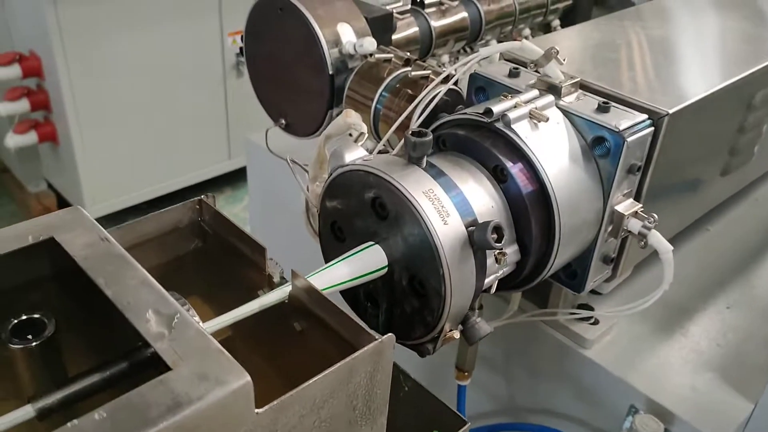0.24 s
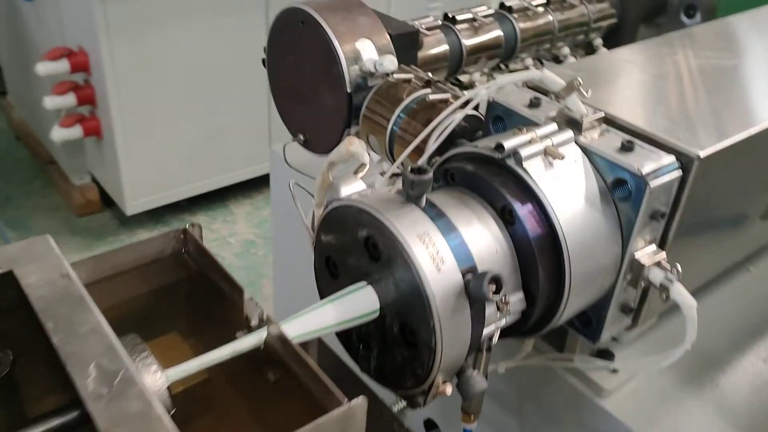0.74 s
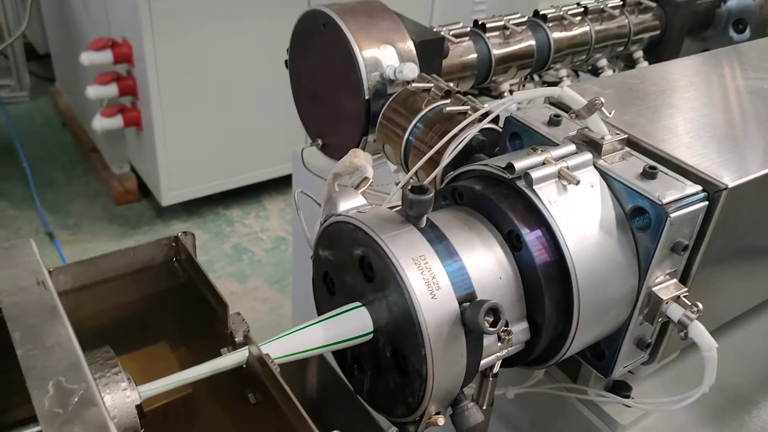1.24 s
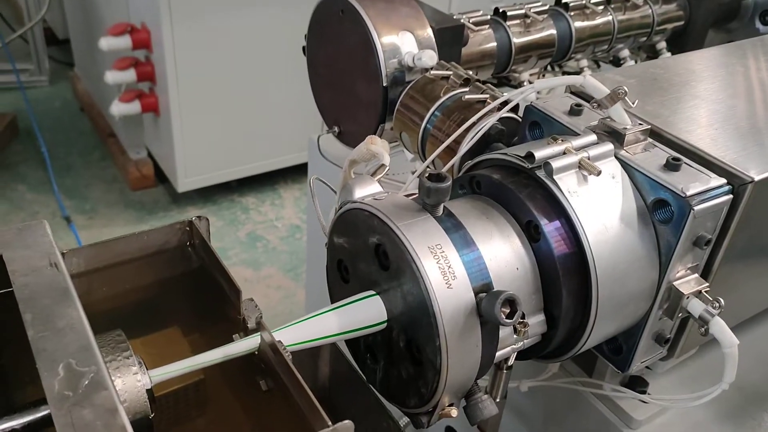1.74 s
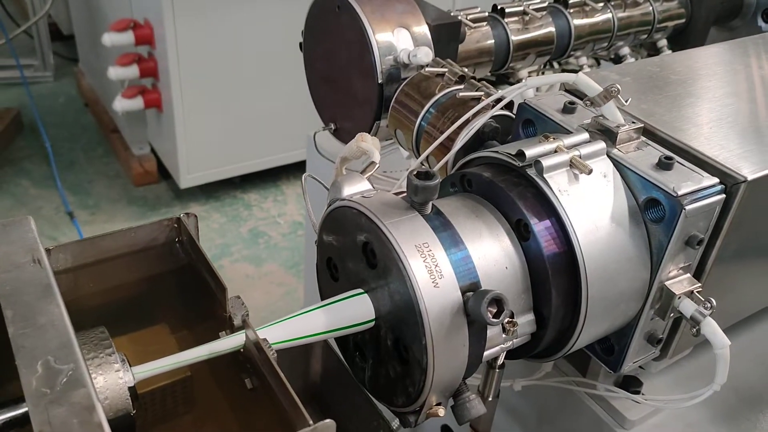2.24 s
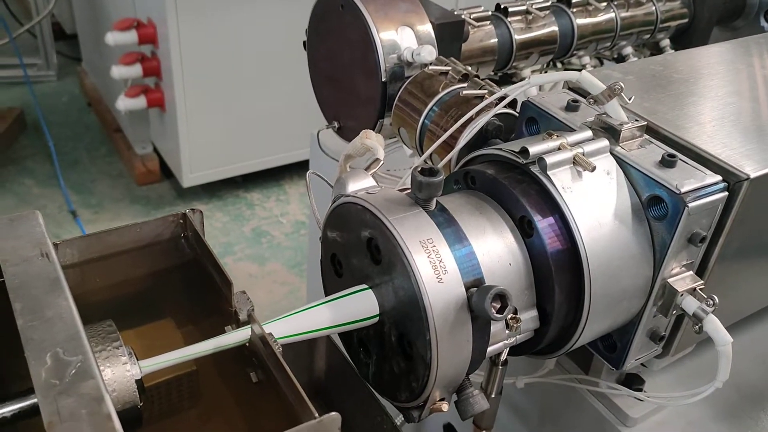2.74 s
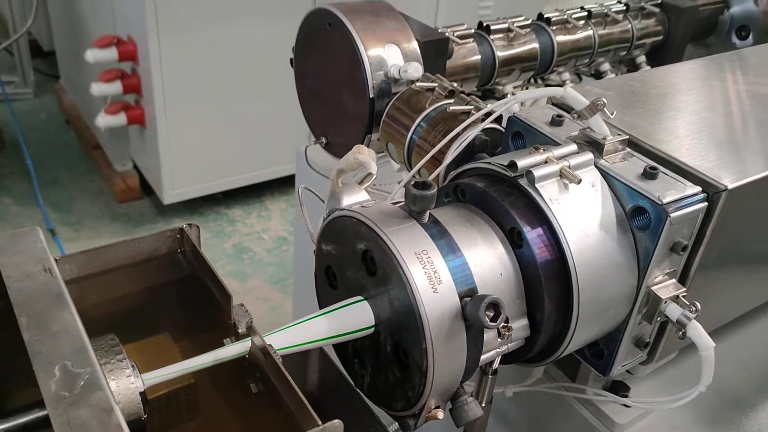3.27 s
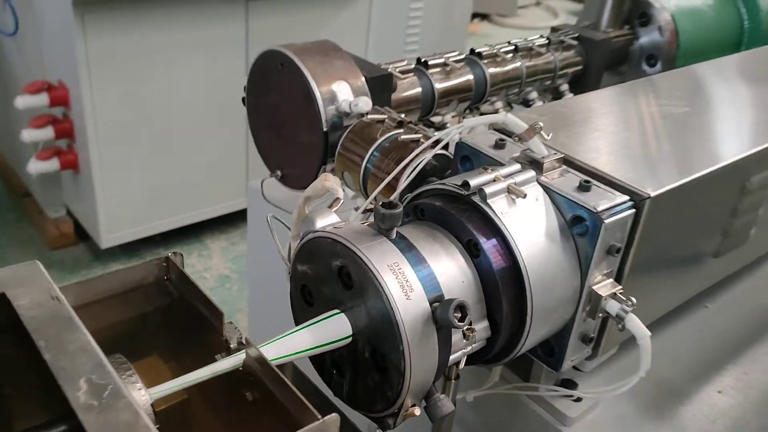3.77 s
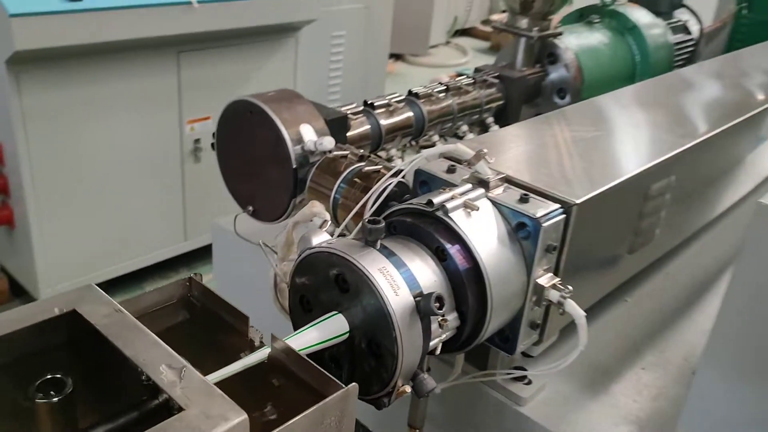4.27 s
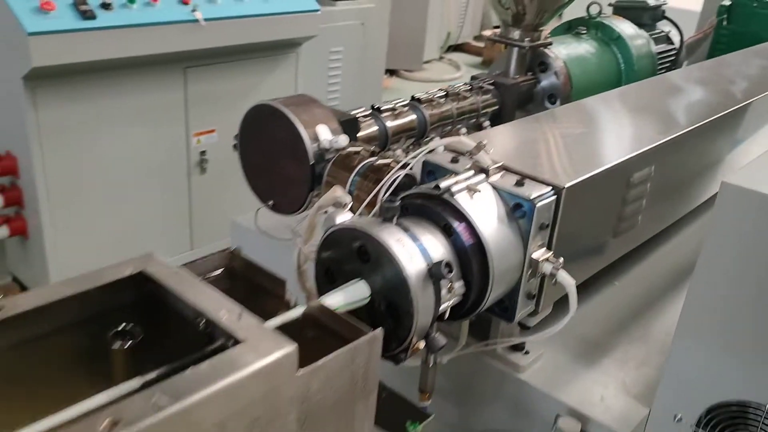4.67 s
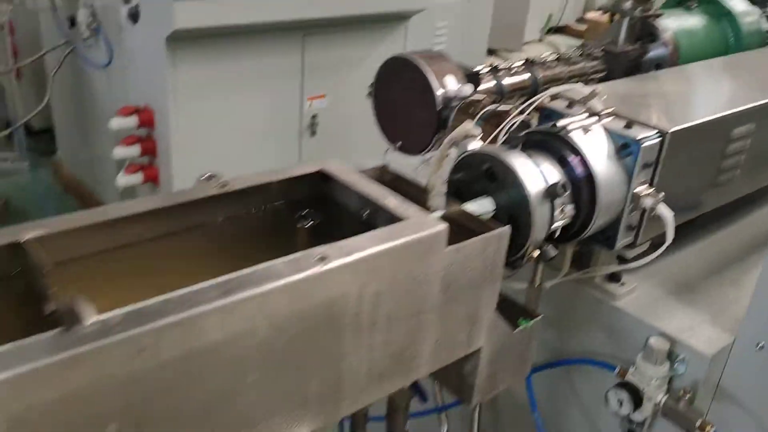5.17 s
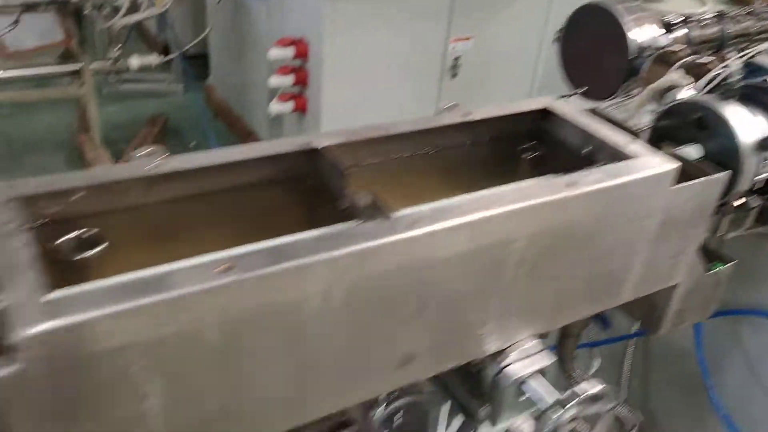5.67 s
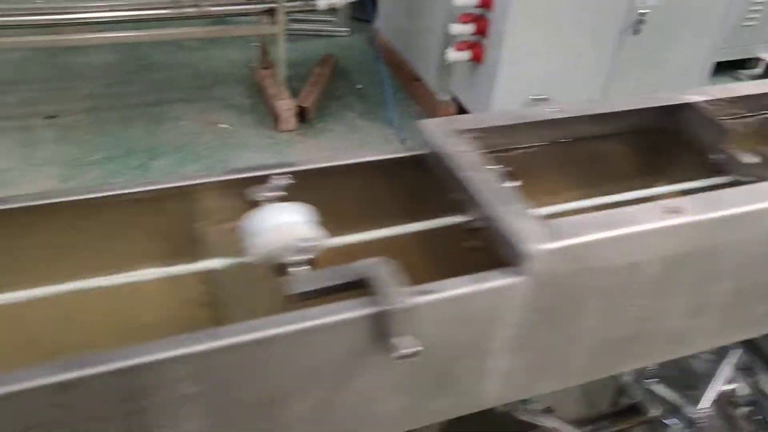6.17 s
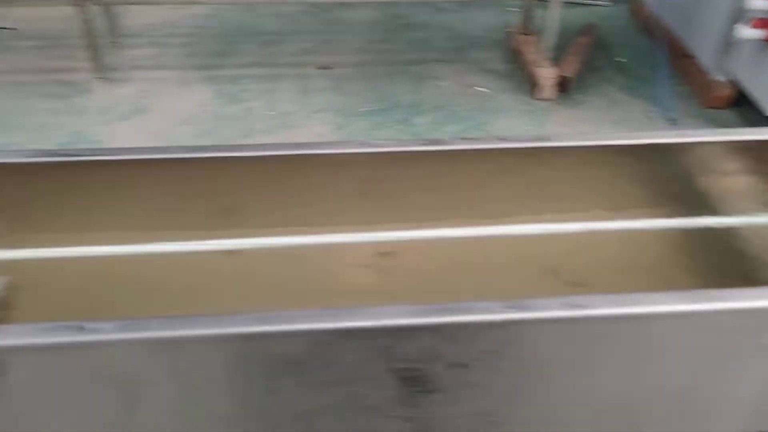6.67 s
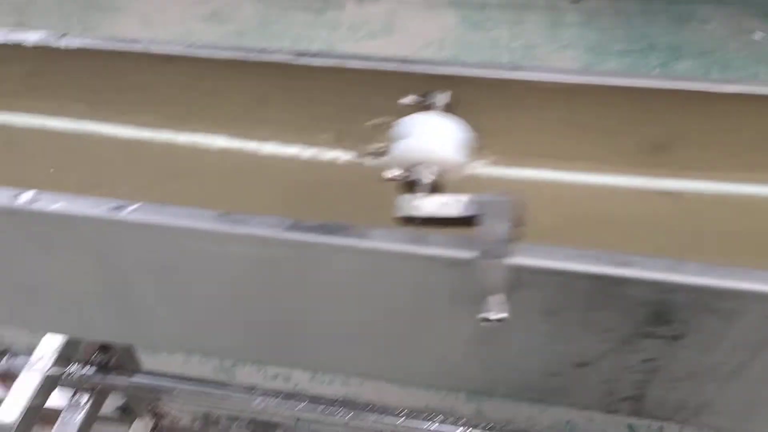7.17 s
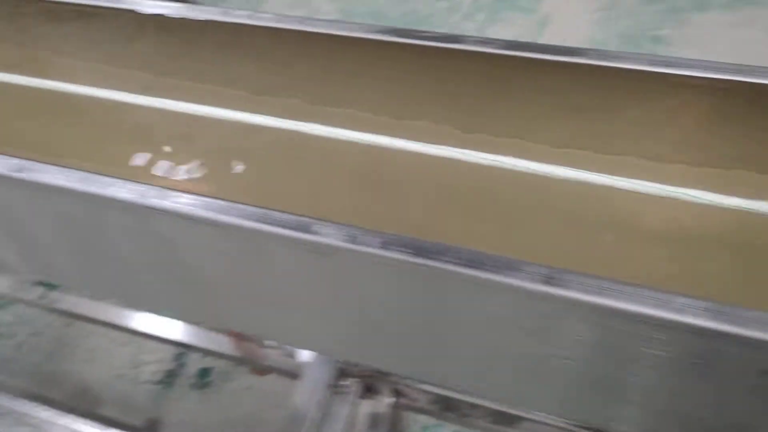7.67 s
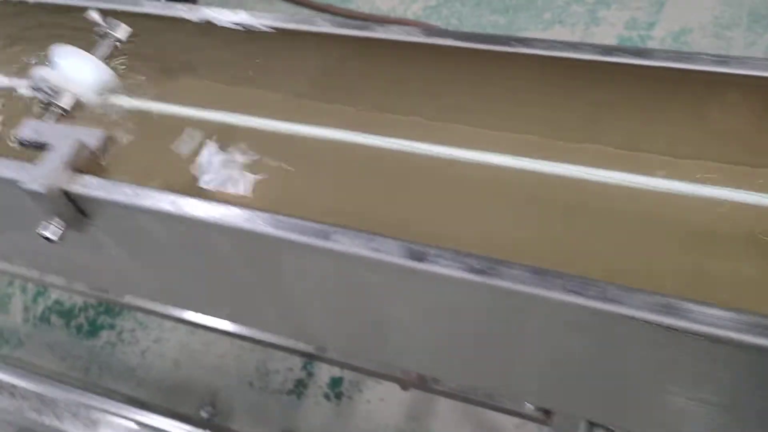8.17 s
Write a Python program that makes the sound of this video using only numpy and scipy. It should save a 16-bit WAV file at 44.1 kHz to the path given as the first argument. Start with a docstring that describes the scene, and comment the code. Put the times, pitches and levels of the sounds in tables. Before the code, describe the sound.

A steady, piercing air hiss and whistling suction over a low machine hum, with a rapid regular clacking that grows into thuds in a factory hall.

```python
"""Straw extrusion line in a factory hall

A phone with two ports is carried from the die along the cooling trough. An air jet and a suction tank hiss as
filtered turbulence, an air leak whistles through narrow resonances, and motors hum as wavering sines.
A cutter chops about five times a second, its impacts ringing damped modes, and its frame grows louder on the way.
Two hollow knocks are ringing noise bursts; two footsteps are low, brief thuds with a scuff of noise.
"""
import sys
import numpy as np
from scipy import signal
from scipy.fft import rfft, irfft
from scipy.io import wavfile
from scipy.ndimage import uniform_filter1d

SR = 44100
rng = np.random.default_rng(int(sys.argv[2]) if len(sys.argv) > 2 else 0)


def unload_wav(signal):
    """Save mono or channel-first audio to the path in sys.argv[1] as 16-bit WAV at rate SR, clipped to [-1, 1]."""
    wavfile.write(
        sys.argv[1],
        SR,
        np.round(np.clip(np.atleast_2d(signal).T, -1, 1) * 32767).astype(np.int16),
    )


N = 371322
TIME = np.arange(N) / SR  # s
BINS = np.arange(N // 2 + 1) * SR / N  # Hz
STROKE_S, FIRST_STROKE_S = .19065, .1025  # the cutter's period and first cut
# lag between the ports, in samples: for sound from obliquely ahead, and for sound from one side
PORT_LAG, BROADSIDE_LAG = 8, 16


def undb(db):
    """Amplitude gain is ten to the power of a twentieth of the decibels."""
    return 10 ** (np.asarray(db) / 20)


def unit(x):
    """Normalise the power: rms 1."""
    return x / np.sqrt(np.mean(x ** 2))


def curves(table):
    """Linear interpolation gives each column of a table a value per sample."""
    s, *columns = np.transpose(table)
    return [np.interp(TIME, s, column) for column in columns]


def slope(points):
    """Spectral envelope: gain per frequency from (Hz, dB) points, falling as the fourth power beyond the ends."""
    hz, db = np.transpose(points)
    f = np.maximum(BINS, 1)
    skirts = np.minimum(1, np.minimum(f / hz[0], hz[-1] / f)) ** 4
    return undb(np.interp(np.log(f), np.log(hz), db)) * skirts


def resonances(modes):
    """Damped oscillators: the complex response of each (Hz, width Hz, dB) mode."""
    f = np.maximum(BINS, 1)
    return [undb(db) / (1 + 1j * (f / hz - hz / f) * hz / width) for hz, width, db in modes]


def colour(x, gain):
    """Linear filtering multiplies the spectrum by a gain per frequency; rms 1."""
    return unit(irfft(rfft(x) * gain, N))


def drift(rate_hz):
    """Low-passed random phases make a smooth random drift of rms 1."""
    slow = BINS[BINS < 4 * rate_hz + 1]
    phases = np.exp(2j * np.pi * rng.random(4096)[:len(slow)])
    return unit(irfft(phases / (1 + (slow / rate_hz) ** 4), N))


def diffuse(alike_hz=720):
    """Diffuse-field coherence: noise at two ports is alike in the bass, unrelated in the treble."""
    likeness = .95 / (1 + (BINS / alike_hz) ** 3)
    mid, side = rfft(rng.standard_normal((2, N)))
    mid = mid * np.sqrt(1 + likeness)
    side = side * np.sqrt(1 - likeness)
    return unit(irfft(np.array([mid + side, mid - side]), N))


def pan(left_over_right_db):
    """Constant-power panning: left and right gains for a level difference."""
    half_db = np.array([left_over_right_db, -left_over_right_db]).reshape(2, -1) / 2
    gains = undb(half_db)
    return gains / np.sqrt(np.mean(gains ** 2, axis=0))


def lagged(pair, count):
    """Interaural delay: sound from the right reaches the left port some samples later."""
    return np.array([np.roll(pair[0], count), pair[1]])


def walked():
    """Uniform motion: metres from the die along the line, after a wait there."""
    start_s, pace_m_per_s = 3.28, 0.502
    return pace_m_per_s * np.maximum(TIME - start_s, 0)


def past(place_m, fade_m):
    """Gradual unmasking: rises smoothly from 0 to 1 as the phone passes a place."""
    return .5 + .5 * np.tanh((walked() - place_m) / fade_m)


def tones(lines):
    """Rotating machines radiate line spectra, which waver as the phone moves through standing waves."""
    total = 0
    for hz, db in lines:
        level = undb(db + 0.41 * drift(0.6))
        phase = 2 * np.pi * (hz * TIME + rng.random()) + 0.73 * drift(1.4)
        total = total + level * np.sin(phase)
    return np.sqrt(2) * total  # a line at 0 dB has rms 1


def stroke_times():
    """Periodic excitation: the cutter's even beat, in seconds."""
    return np.arange(FIRST_STROKE_S, N / SR + 1, STROKE_S)


def repeated(response):
    """Convolution with a pulse train: one response per stroke, each a little stronger or weaker."""
    starts = stroke_times()
    lead = int(round(2 * STROKE_S * SR))  # the cutter is already running
    blows = np.zeros(N + 2 * SR)
    blows[(starts * SR).astype(int)] = undb(0.2 * rng.standard_normal(len(starts)))
    return signal.fftconvolve(blows[None], response[:, :SR], axes=1)[:, lead:lead + N]


def echoes(delay_s, t60_s, tail_db, hall_t60_s):
    """Exponential reverberant decay: a dense burst of early reflections, then the hall's tail."""
    age = np.maximum(TIME[:SR] - delay_s, 0)
    early = undb(-60 * age / t60_s)
    late = undb(tail_db - 60 * age / hall_t60_s)
    return diffuse()[:, :SR] * (early + late) * (age > 0)


def strokes(delay_s, t60_s, tail_db, hall_t60_s, count=4):
    """Reverberant strokes whose echo pattern, set by position in the hall, is crossfaded at constant power."""
    place = TIME / TIME[-1] * (count - 1)
    total = 0
    for k in range(count):
        weight = np.cos(np.pi / 2 * np.clip(place - k, -1, 1))
        total = total + repeated(echoes(delay_s, t60_s, tail_db, hall_t60_s)) * weight
    return total


def even(x):
    """Running power normalisation: hold the level, averaged over two strokes, at rms 1."""
    power = uniform_filter1d(np.mean(x ** 2, axis=0), int(2 * STROKE_S * SR))
    return x / np.sqrt(power)


def glancing(x, echo_db=-10, drift_s=0.000139):
    """Comb filtering: steel panels return near echoes whose delays drift with the hand."""
    delays_s = rng.uniform(.001, .008, 3)
    near = sum(np.interp(TIME - d - drift_s * drift(0.71), TIME, x) for d in delays_s)
    return (x + undb(echo_db) * near) / np.sqrt(1 + len(delays_s) * undb(echo_db) ** 2)


def air_jet():
    """Jet turbulence beams its treble at the left port, is shaded at the right, and reflects to both."""
    # The jet as the phone leaves its beam. Each row: time in seconds, core level in dB, sizzle level in dB.
    jet_levels = [(0, -25.5, -36), (1.0, -24, -30), (3.6, -24, -29.5), (4.7, -25.5, -32),
                  (5.25, -24.5, -28.5), (5.7, -24, -30), (5.92, -30, -41), (6.35, -33, -42),
                  (6.65, -33, -34.5), (7.0, -38, -36), (8.42, -39, -40)]
    # Spectra of its low skirt, core and sizzle. Each row: frequency in Hz, relative density in dB per Hz.
    jet_skirt = [(4300, 6.5), (4900, 6.5), (5350, -2.5), (5750, 13), (6100, 5), (6700, -0.5)]
    jet_core = [(5800, -18), (6450, -3.5), (6850, -5.5), (7300, 0), (7700, -2.5), (8300, -7), (8900, -12),
                (10200, -15.5), (12000, -33)]
    jet_sizzle = [(9500, -55), (11500, 0.5), (13200, 1), (14300, 8), (15700, 2.5)]
    # Spectrum of the hiss that fills the hall. Each row: frequency in Hz, relative density in dB per Hz.
    hall_hiss = [(3900, -21), (5000, -3.5), (5700, -33), (6100, -21), (6500, -0.5), (6800, 0), (7400, 4),
                 (8200, 2.5), (8900, -8.5), (10400, -4.5), (12500, -16.5), (14300, -20), (15700, -10)]
    # Right port against left, shaded by the phone's body. Each row: frequency in Hz, gain in dB.
    body_shade = [(4000, -36), (7300, -20), (9000, -11), (10800, -38), (13000, -21), (16000, -31)]
    turned = past(1.82, 0.029)  # the tank hides the jet and the phone turns along the trough
    skirt_db = -35 - 3 * turned  # the skirt spreads widely and so drops only a little
    core_db, sizzle_db = curves(jet_levels)
    beam = 0
    for shape, db in ((jet_skirt, skirt_db), (jet_core, core_db), (jet_sizzle, sizzle_db)):
        beam = beam + colour(rng.standard_normal(N), slope(shape)) * undb(db + 0.84 * drift(23))
    beam = glancing(beam)
    # the phone swings round once, and the jet crosses from the left port towards the right
    swing_s, swing_length_s, swing_left_db, swing_right_db = 7.12, 0.26, -7.5, 12
    swing = np.exp(-((TIME - swing_s) / swing_length_s) ** 2)
    left = beam * undb(swing_left_db * swing)
    shaded = irfft(rfft(beam) * slope(body_shade), N)
    turned_db = 8  # part of the shade lost once the phone has turned
    right = np.roll(shaded, BROADSIDE_LAG) * undb(turned_db * turned + swing_right_db * swing)
    reflected = colour(diffuse(), slope(hall_hiss)) * undb(-33.5 + 1.0 * drift(14))
    return np.array([left, right]) + reflected


def blown(modes, waver_db, rate_hz, direct_db, wander_s, sputter_db):
    """Sputtering turbulence drives wavering resonances; part arrives straight, part by the walls."""
    total = 0
    sputter = undb(sputter_db * drift(53))
    narrowed = [(hz, 0.6 * width, db) for hz, width, db in modes]
    for response in resonances(narrowed):
        drive = (diffuse() + undb(direct_db) * rng.standard_normal(N)) * sputter
        voice = irfft(rfft(drive) * abs(response) ** 2, N)
        total = total + voice * undb(waver_db * drift(rate_hz))
    clock = TIME - wander_s * drift(4.0)  # a drifting delay bends the pitch
    return lagged(unit(np.array([np.interp(clock, TIME, side) for side in total])), BROADSIDE_LAG)


def suction():
    """Flow-excited resonance: air and water sucked through the tank's gaps seethe, a small leak whistles above."""
    # Tank, loudest as the phone passes its mouth, then the leak.
    # Each row: time in seconds, level in dB, left minus right in dB.
    tank_levels = [(0, -40, 3.5), (1.4, -36.5, 1), (3.6, -37, 2), (4.5, -40, 6), (5.6, -36.5, 0.5),
                   (5.9, -33, 4), (6.1, -32.5, 7), (6.4, -32, 11), (6.68, -28, 18), (6.9, -33, 12),
                   (7.2, -39, 5), (7.7, -34, 12), (8.42, -32, 16)]
    leak_levels = [(0, -38.5, 4), (1.1, -37.5, 0.5), (3.0, -40, -1.5), (4.3, -35.5, 5.5), (5.05, -36, 4.5),
                   (6.2, -43.5, -1), (6.9, -38.5, 0), (7.3, -43, -2), (8.42, -41, 0)]
    # Their resonances, before narrowing and squaring. Each row: frequency in Hz, width in Hz, gain in dB.
    tank_modes = [(1830, 320, -19), (2212, 360, 0.5), (2400, 30, 1), (2453, 54, 5.5), (2604, 720, 1.5),
                  (2738, 63, 6), (2850, 16, 4), (2963, 490, 3)]
    leak_modes = [(3373, 155, 2.5), (3596, 560, -1), (3773, 93, -1), (4165, 78, -0.5)]
    tank_db, tank_pan = curves(tank_levels)
    leak_db, leak_pan = curves(leak_levels)
    tank = blown(tank_modes, waver_db=2.0, rate_hz=12.0, direct_db=0.0, wander_s=0.000089, sputter_db=0.5)
    leak = blown(leak_modes, waver_db=1.17, rate_hz=20, direct_db=-15.0, wander_s=0.000302, sputter_db=0.5)
    return tank * undb(tank_db) * pan(tank_pan) + leak * undb(leak_db) * pan(leak_pan)


def hall():
    """A diffuse field: the wash of fans and distant machines from all round."""
    # Each row: frequency in Hz, relative density in dB per Hz.
    hall_spectrum = [(12, -11), (27, 2), (45, -11.5), (70, -7.5), (100, -8.5), (140, -9), (200, -2),
                     (300, -0.5), (430, -10), (600, -10), (800, -4.5), (1100, -9.5), (1600, -12),
                     (2600, -10.5), (4500, -24)]
    return colour(diffuse(), slope(hall_spectrum)) * undb(-39.5 + .5 * drift(15)) * pan(3.8)


def extruder():
    """Inverse-distance law: barrel fans and the drive's hum fall off as the phone moves away."""
    # Fan rush. Each row: frequency in Hz, relative density in dB per Hz.
    fan_spectrum = [(230, 0), (290, -7.5), (320, -15), (352, 7.5), (388, 1.5), (430, 7), (490, 5.5),
                    (525, 2), (580, 4), (680, 1), (760, 0), (950, -7), (1300, -25), (1700, -15)]
    # Drive shaft, mains and gearbox lines. Each row: frequency in Hz, rms level in dB before the drive gain.
    drive_lines = [(25.0, -67), (88.9, -67), (94.0, -54), (100.0, -57.5), (109.6, -54.5), (114.8, -55),
                   (293.9, -62.5), (412.1, -56), (423.0, -53.5), (565.5, -61), (749, -58)]
    aside_m, fan_db, drive_db = 1.42, -41, 1.5  # levels as heard from the start of the walk
    nearness = aside_m / np.hypot(aside_m, walked())
    fans = colour(diffuse(), slope(fan_spectrum)) * undb(fan_db + .5 * drift(2.0))
    drive = tones(drive_lines) * undb(drive_db)
    return (fans * pan(3.9) + drive * pan(6.0)) * nearness


def trough(grain_db=1.5):
    """Amplitude-modulated noise: cooling water in the open trough seethes in fine, uneven grains."""
    # Each row: frequency in Hz, relative density in dB per Hz.
    water_spectrum = [(900, -7), (1400, -10), (1780, 2.5), (1980, 1), (2180, 5.5), (2450, 6), (3000, -20),
                      (3900, -32)]
    level_db = -56 + 19.5 * past(1.12, 0.62)
    grains = diffuse() * undb(grain_db * drift(62))
    return colour(grains, slope(water_spectrum)) * undb(level_db) * pan(8)


def cutter(load_depth=0.45, load_delay_s=0.067, return_db=-9, rebound_db=-10):
    """Impulsive excitation of modes: guard and frame ring twice a stroke, out and back, over the motor's hum."""
    # The cutter's frame, then its sheet guard. Each row: frequency in Hz, width in Hz, gain in dB.
    frame_modes = [(143, 17, -3.5), (180.3, 11, -5.5), (215.4, 10, 0), (249.5, 4.8, 0), (292.6, 20, -0.5),
                   (329, 28, -5), (480, 116, -9.5)]
    guard_modes = [(765, 110, 4.5), (868, 58, 9), (918, 55, 4.5), (1045, 60, -4), (1250, 400, -15)]
    # Motor lines. Each row: frequency in Hz, level in dB against the motor's level.
    motor_lines = [(108.5, -10), (183.2, 2.5), (215.2, -30), (306.8, -18)]
    along_m, aside_m, thump_db = 3.7, 1, -52.5  # place from the die; the frame's level as heard there
    nearness = np.hypot(along_m, aside_m) / np.hypot(along_m - walked(), aside_m)
    guard_db = -53 + 13 * past(2.07, 0.25)  # screened until the phone has come far enough
    motor_db = -59.5 + 9.5 * past(0.79, 0.13)  # comes out from behind the tank

    rattle = strokes(0.00037, t60_s=0.069, tail_db=-14, hall_t60_s=1.0)
    rebound = repeated(echoes(.082, t60_s=0.076, tail_db=-22, hall_t60_s=.6))
    rattle = rattle + undb(rebound_db) * rebound
    guard = even(colour(rattle, sum(r * abs(r) for r in resonances(guard_modes))))

    shake = strokes(0.0038, t60_s=0.15, tail_db=-7.0, hall_t60_s=1.0)
    shake = shake + undb(return_db) * strokes(.04, t60_s=0.071, tail_db=-12, hall_t60_s=0.47)
    frame = 0
    for response, (_, width, db) in zip(resonances(frame_modes), frame_modes):
        ring = even(colour(shake, response * abs(response)))
        # a wide mode takes up more of the blow than a narrow one
        frame = frame + ring * undb(db) * np.sqrt(width)
    frame = unit(frame)

    # the motor labours once in every stroke
    load = 1 + load_depth * np.cos(2 * np.pi * (TIME - FIRST_STROKE_S - load_delay_s) / STROKE_S)
    motor = load * tones(motor_lines) * undb(motor_db)
    return (frame * undb(thump_db) * nearness + motor + guard * undb(guard_db)) * pan(4.4)


def blade(crack_db=30, scatter_db=0.5):
    """Modal impact: each dry clack strikes the blade's modes differently, and faint reflections follow."""
    # Blade. Each row: frequency in Hz, width in Hz, gain in dB.
    blade_modes = [(1040, 87, 4), (1230, 370, 4), (1460, 480, -1.5)]
    # The clack along the way. Each row: time in seconds, level in dB.
    clack_levels = [(0, -38), (0.3, -37), (0.49, -40), (1.06, -32), (1.25, -33), (1.44, -33), (1.82, -35),
                    (2.01, -36.5), (2.2, -35), (2.4, -34), (2.58, -34.5), (2.96, -32), (3.53, -33),
                    (3.75, -37), (4.68, -39), (5.05, -36), (5.25, -50), (6.1, -36), (8.42, -41)]
    delay_s, crack_s = .0016, .003  # lag after the stroke; length over which the level is reckoned
    strike = np.zeros((2, N))
    strike[:, :SR] = echoes(0.0005, t60_s=0.03, tail_db=-17, hall_t60_s=.4)
    strike[:, 0] += undb(crack_db)  # the direct blow
    level_db, = curves(clack_levels)
    cuts = ((stroke_times() + delay_s) * SR).astype(int)
    cuts = cuts[cuts < N]
    rings = [rfft(strike) * r * abs(r) for r in resonances(blade_modes)]
    clacks = 0
    for ring in rings:
        blows = np.zeros(N)
        blows[cuts] = undb(level_db[cuts] + scatter_db * rng.standard_normal(len(cuts)))
        clacks = clacks + irfft(rfft(blows) * ring, N)
    one_clack_rms = irfft(sum(rings), N).std()
    return clacks / one_clack_rms * np.sqrt(crack_s * SR / N) * pan(4.8)


def carriage(near_db=-24.5, far_db=-30.5, room_db=-22):
    """Impact and reverberation: the carriage thuds on two stops, the hall fills the gaps; it grows on the walk."""
    # Stops, out and back. Each row: seconds after the cut, relative level in dB.
    stops = [(.018, -3), (.059, -5)]
    # The thud. Each row: frequency in Hz, width in Hz, gain in dB.
    thud_modes = [(184, 16, -5), (215, 25, -3), (300, 35, 3.5), (324, 45, -1)]
    ring = irfft(sum(r * abs(r) ** .5 for r in resonances(thud_modes)), N)
    thuds = sum(undb(db) * np.roll(ring, int(s * SR)) for s, db in stops) / abs(ring).max()
    direct = repeated(thuds[None])
    tail = even(colour(strokes(0.023, t60_s=0.18, tail_db=0, hall_t60_s=1.0), rfft(ring)))
    level_db = far_db + (near_db - far_db) * past(1.8, 0.41)
    return (direct + tail * undb(room_db)) * undb(level_db) * pan(5.9)


def tank_boom():
    """Structure-borne sound: strokes travel along the line and boom in the steel tank as the phone passes."""
    # The tank's hollow body. Each row: frequency in Hz, width in Hz, gain in dB.
    body_modes = [(442, 69, 1), (568, 68, 1.5), (655, 110, -0.5), (860, 240, -6.5)]
    boom_db, place_m, reach_m = -39.5, 1.68, 0.26
    shake = strokes(0.017, t60_s=.3, tail_db=-3, hall_t60_s=1.4)
    boom = even(colour(shake, sum(r * abs(r) for r in resonances(body_modes))))
    closeness = 1 / (1 + ((walked() - place_m) / reach_m) ** 2)
    return boom * undb(boom_db) * closeness * pan(9.8)


def knocks(t60_s=0.47, attack_s=0.0084):
    """Reverberant smearing: hollow knocks on the line are decaying noise bursts through a few modes."""
    # Each row: start in seconds, pitch in Hz, peak in dB before panning.
    knock_events = [(3.62, 595, -32), (4.095, 743, -29.5)]
    # Each row: multiple of the pitch, width in Hz, gain in dB.
    knock_modes = [(1, 130, -2), (1.5, 70, -4.5), (1.7, 80, -5)]
    total = 0
    for s, pitch_hz, db in knock_events:
        age = np.maximum(TIME - s, 0)
        burst = diffuse() * undb(-60 * age / t60_s) * np.minimum(age / attack_s, 1)
        modes = [(pitch_hz * multiple, width, gain) for multiple, width, gain in knock_modes]
        ring = colour(burst, sum(r * abs(r) for r in resonances(modes)))
        total = total + ring / abs(ring).max() * undb(db)
    return total * pan(5.4)


def spray(grain_db=2.0):
    """Near-field source: fine spray fizzes in the tank's mouth, heard only from straight above it."""
    # Each row: frequency in Hz, relative density in dB per Hz.
    spray_spectrum = [(1850, -9), (2150, 11), (2500, 12), (3400, -21), (4200, -18), (4900, 8), (5400, 3),
                      (6100, -9), (6800, 4)]
    level_db, from_m, to_m, fade_m = -36.5, 1.29, 1.79, 0.056
    above = past(from_m, fade_m) - past(to_m, fade_m)
    fizz = colour(diffuse() * undb(grain_db * drift(79)), slope(spray_spectrum))
    return fizz * above * undb(level_db) * pan(11)


def footsteps(thud_hz=68, fade_s=0.011, scuff_db=-6, scuff_s=0.011):
    """Heavily damped impact: soft heel thuds of a couple of low cycles, and the sole's dull scuff."""
    # Each row: start in seconds, nominal peak in dB before panning.
    step_events = [(5.808, -40), (6.762, -36)]
    # A sole on the floor. Each row: frequency in Hz, relative density in dB per Hz.
    scuff_spectrum = [(110, 9), (250, 2), (560, 9), (800, 5), (1100, -11)]
    scuff = colour(diffuse(), slope(scuff_spectrum)) * undb(scuff_db)
    total = 0
    for s, db in step_events:
        age = np.maximum(TIME - s, 0)
        heel = age / fade_s * np.exp(1 - age / fade_s) * np.sin(2 * np.pi * thud_hz * age)
        sole = scuff * age / scuff_s * np.exp(1 - age / scuff_s)
        total = total + undb(db) * (heel + sole)
    return total * pan(6)


def scene():
    """Superposition of all sources; the slanted phone hears the machines slightly earlier on the right."""
    machines = lagged(extruder() + hall() + blade() + tank_boom() + knocks(), PORT_LAG)
    far_end = lagged(trough() + cutter() + carriage(), BROADSIDE_LAG)
    return air_jet() + suction() + machines + far_end + spray() + footsteps()


def record(dry, notch_hz=4550, notch_width_hz=270):
    """Band-stop and low-pass filtering: a narrow treble band around 4.5 kHz is thinned out, and the top is cut."""
    top_hz = 15800
    band_stop = undb(-26 * np.exp(-((BINS - notch_hz) / notch_width_hz) ** 2))
    thinned = irfft(rfft(dry) * band_stop, N)
    return signal.sosfilt(signal.ellip(10, .2, 80, top_hz, fs=SR, output="sos"), thinned)


dry = scene()
out = record(dry)
unload_wav(out)
```